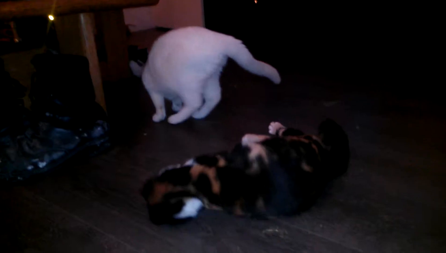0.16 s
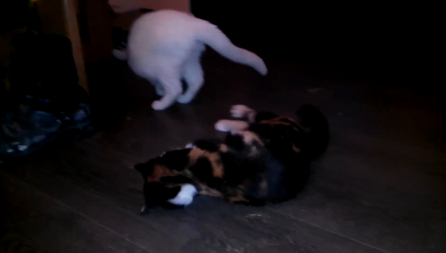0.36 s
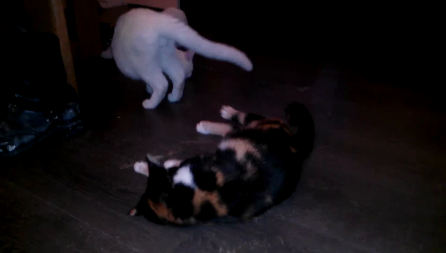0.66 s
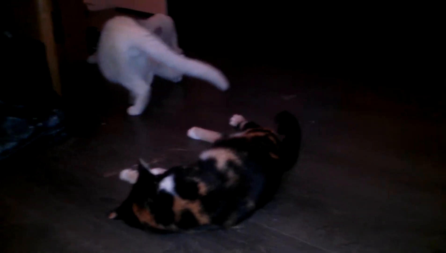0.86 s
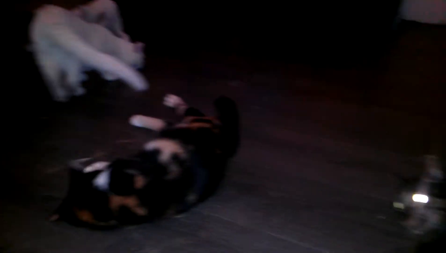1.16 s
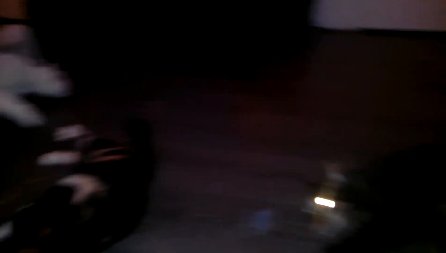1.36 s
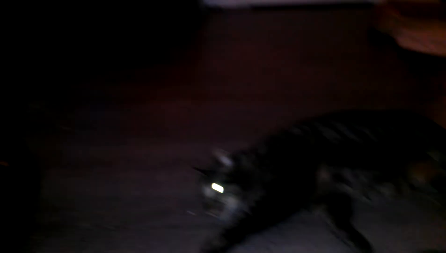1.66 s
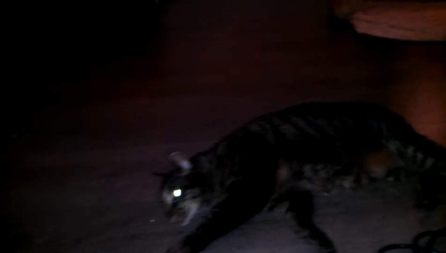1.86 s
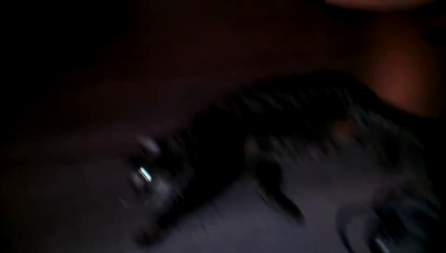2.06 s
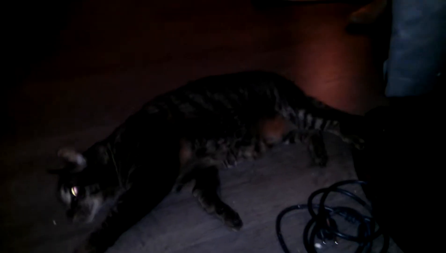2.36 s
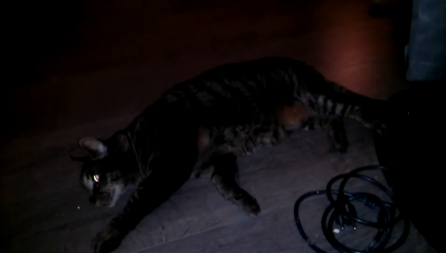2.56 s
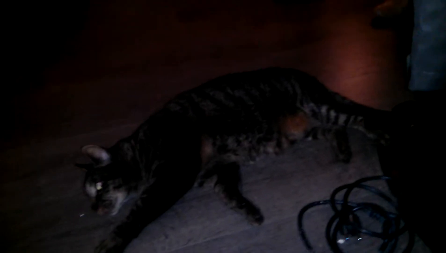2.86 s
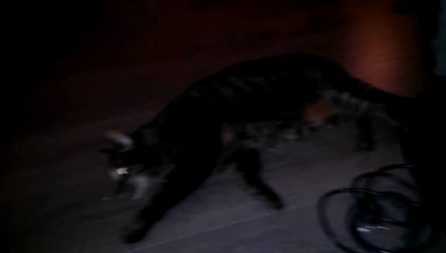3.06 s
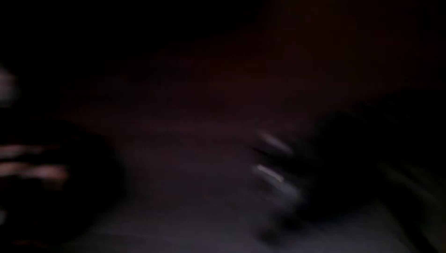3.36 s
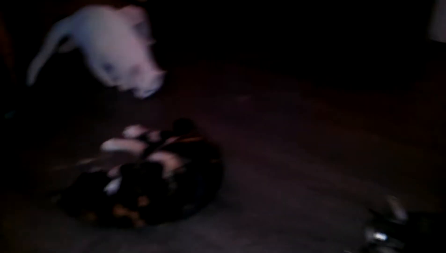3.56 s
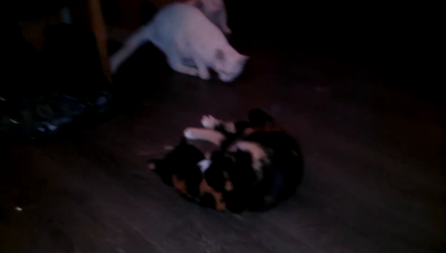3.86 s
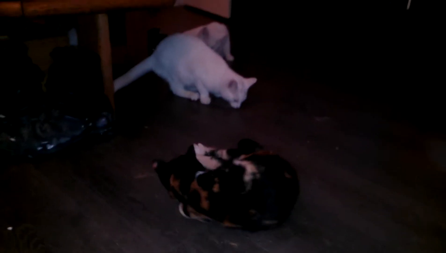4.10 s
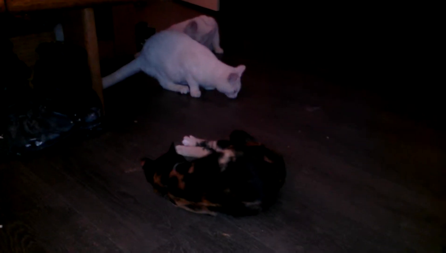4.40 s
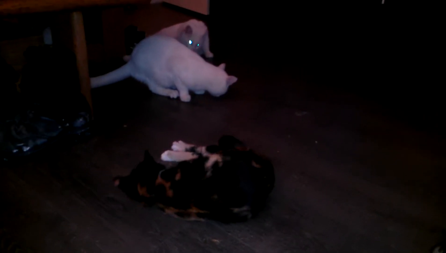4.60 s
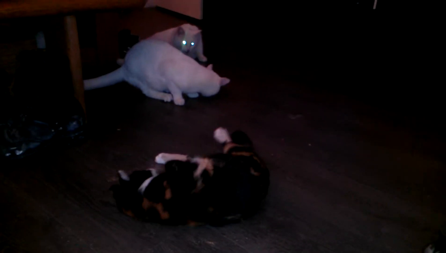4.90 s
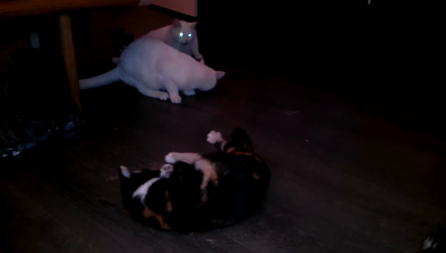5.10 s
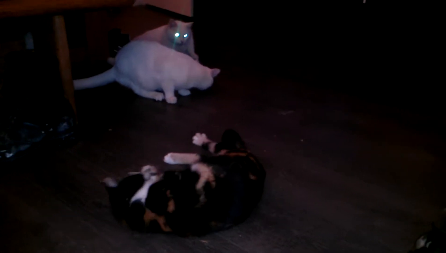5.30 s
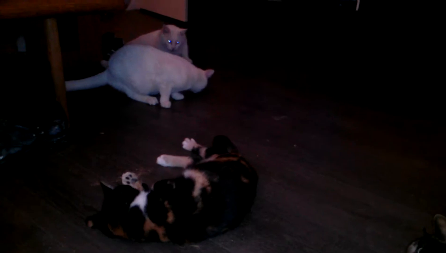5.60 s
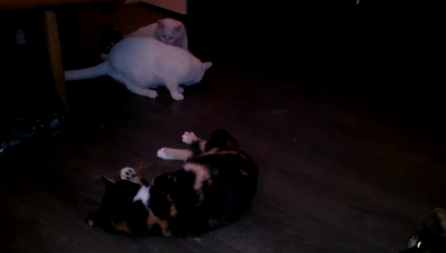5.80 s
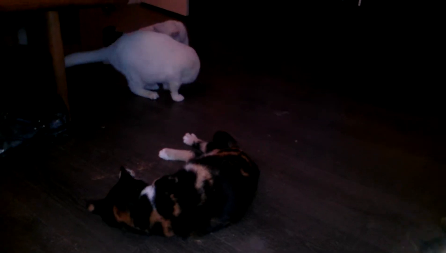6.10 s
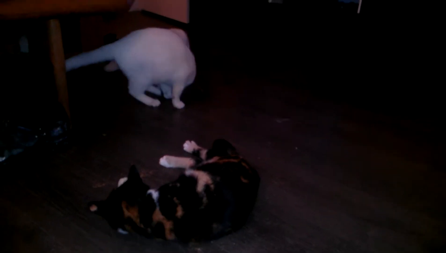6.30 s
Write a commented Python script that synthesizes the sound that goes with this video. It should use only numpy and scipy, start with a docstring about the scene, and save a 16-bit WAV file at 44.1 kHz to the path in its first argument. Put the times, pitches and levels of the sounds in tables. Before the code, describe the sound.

Cats roll softly on floorboards under clothing swishes and close microphone handling noise, including one loud scrape.

```python
"""Cats rolling on a wooden floor

In a quiet room fur brushes the boards, the wood knocks faintly and clothing slides and scuffs. A hand
and sleeve rub over a hand-held camera close by, which thumps, pops, judders and ticks.
Friction is grainy filtered noise; thumps and knocks are damped oscillations. Under it all lie room
noise and a faint mains hum, in mono."""
import sys
import numpy as np
from scipy import signal
from scipy.fft import rfft, irfft, next_fast_len
from scipy.io import wavfile
from scipy.ndimage import map_coordinates

SR = 44100
rng = np.random.default_rng(int(sys.argv[2]) if len(sys.argv) > 2 else 0)


def transcribe(signal):
    """Save signal, clipped to [-1, 1], as a 16-bit WAV file at the path in sys.argv[1]."""
    frames = np.atleast_2d(signal).T
    limited = np.clip(frames, -1, 1)
    pcm = np.round(limited * 32767).astype(np.int16)
    wavfile.write(sys.argv[1], SR, pcm)


N = 284445


def amp(db):
    """Amplitude ratio of a level in decibels."""
    return 10 ** (np.asarray(db) / 20)


def unit(x):
    """Normalisation to an rms of 1."""
    return x / np.sqrt(np.mean(x ** 2) + 1e-20)


def clock():
    """The time of every sample, in seconds."""
    return np.arange(N) / SR


def colour(spectrum, hz):
    """Spectral envelope: gain at hz, interpolated from (frequency_hz, gain_db) on a log axis."""
    frequency_hz, gain_db = np.transpose(spectrum)
    return amp(np.interp(np.log(hz + 1), np.log(frequency_hz), gain_db))


def filtered(x, response):
    """Linear filtering: the spectrum of x times a frequency response."""
    size = next_fast_len(N + 8192)
    hz = np.fft.rfftfreq(size, 1 / SR)
    return irfft(rfft(x, size) * response(hz), size)[:N]


def softened(x, cutoff_hz):
    """A second-order low-pass rolls off the treble."""
    return signal.lfilter(*signal.butter(2, min(cutoff_hz, SR / 3), fs=SR), x)


def wobble(rate_hz):
    """Random modulation: a smooth curve through rate_hz Gaussian values a second."""
    knots = rng.standard_normal(int(N * rate_hz / SR) + 4)
    return map_coordinates(knots, [clock() * rate_hz])


def swell(t, rise_s, fall_s, roundness=0.89):
    """Exponential growth and decay, joined by a rounded top at t = 0."""
    distance = np.where(t < 0, t / rise_s, t / fall_s)
    return np.exp(roundness - np.hypot(distance, roundness))


def held(contour, fade_s):
    """Amplitude envelope through (time_s, level_db), fading exponentially beyond both ends."""
    t = clock()
    time_s, level_db = np.transpose(contour)
    outside_s = np.abs(t - np.clip(t, time_s[0], time_s[-1]))
    return amp(np.interp(t, time_s, level_db)) * np.exp(-outside_s / fade_s)


def friction(grain_hz, grain_db):
    """Countless tiny slips add up to Gaussian noise, bunched into grains."""
    return rng.standard_normal(N) * amp(grain_db * wobble(grain_hz))


def fibres(spectrum):
    """Friction of hairs or threads: a grainy hiss with the given spectrum, at rms 1."""
    slips = friction(grain_hz=240, grain_db=1.68)
    return unit(filtered(slips, lambda hz: colour(spectrum, hz)))


def shell_friction():
    """Forced vibration: friction drives the resonant modes of the camera shell."""
    # spectrum of the rubbing: frequency_hz, gain_db
    spectrum = [(25, 1), (70, 9), (160, 5), (350, -2.5), (800, -5.5), (1200, -10), (2000, -9), (3000, -7.5),
                (5000, -5), (6500, -10), (8500, -21.5), (16000, -15.5)]
    # shell resonances: centre_hz, bandwidth_hz, gain_db
    modes = [(400, 140, -10), (497.5, 33, -6.5), (677, 65, -14.5), (1075, 51, -5), (1360, 680, 1),
             (1792, 40, -7)]

    def response(hz):
        ringing = sum(amp(gain_db) * 1j * hz * width / (centre ** 2 - hz ** 2 + 1j * hz * width)
                      for centre, width, gain_db in modes)
        return colour(spectrum, hz) * (1 + ringing)

    return filtered(friction(grain_hz=580, grain_db=-0.5), response)


def room():
    """The noise floor: low room noise, microphone hiss and a hum that wavers in level and phase."""
    # background spectrum: frequency_hz, gain_db
    spectrum = [(12, -38), (20, 7.5), (55, -3.5), (70, -8), (107, -2), (172, -10.5), (209, -11),
                (317, -14.5), (891, -23), (1020, -25), (1390, -25.5), (4760, -28), (6470, -45),
                (15800, -30)]
    # mains hum partials: pitch_hz, level_db
    partials = [(49.5, -57), (100, -60), (200, -67.5)]
    air = unit(filtered(rng.standard_normal(N), lambda hz: colour(spectrum, hz)))
    hum = np.zeros(N)
    for pitch_hz, level_db in partials:
        amplitude = np.sqrt(2) * amp(level_db + 0.77 * wobble(5.5))
        hum += amplitude * np.sin(2 * np.pi * pitch_hz * clock() + 1.9 * wobble(7.4))
    return amp(-52.5 + 0.65 * wobble(14)) * air + hum


def catches(rise_s=0.00059, cutoff_hz=7760):
    """Transient friction: the grip catches on the shell with a sudden scratch."""
    # snags of the grip: peak_s, level_db, decay_s
    snags = [(0.014, -32.5, 0.0072), (1.127, -32.5, 0.013), (1.157, -23.5, 0.0034), (4.521, -51, 0.023),
             (4.554, -41.5, 0.0082), (5.233, -41, 0.025), (5.342, -36, 0.039), (5.38, -31.5, 0.0029)]
    envelope = np.zeros(N)
    for peak_s, level_db, decay_s in snags:
        t = clock() - peak_s
        envelope += amp(level_db) * np.exp(np.minimum(t / rise_s, -t / decay_s))
    return envelope * unit(softened(shell_friction(), cutoff_hz))


def pops(flip_share=0.66, skin_cutoff_hz=1460):
    """A bipolar pulse, softened by skin: pressure builds, flips as the grip slips, and relaxes."""
    # slips of the grip: centre_s, relative_level_db, width_s
    slips = [(0.0165, -20.5, 0.0029), (1.0886, -17, 0.0011), (1.1285, -17, 0.00044), (1.1585, -8, 0.00079),
             (1.939, -10.5, 0.00055), (4.069, -27.5, 0.0017), (4.1958, -24.5, 0.00026),
             (6.25, -11.5, 0.00092)]
    pressure = np.zeros(N)
    for centre_s, level_db, width_s in slips:
        widths = (clock() - centre_s) / width_s
        pressure -= amp(level_db) * np.tanh(widths / flip_share) * np.exp(-np.abs(widths))
    return softened(pressure, skin_cutoff_hz)


def thumps(decay_cycles=0.9):
    """Heavily damped oscillation: a bump rocks the camera for a cycle or two."""
    # soft bumps: start_s, relative_level_db, pitch_hz
    bumps = [(0.017, -17.5, 53), (1.357, -13, 57.95), (1.401, -11, 165), (1.645, -35.5, 55),
             (3.206, -31, 42.6), (3.251, -32.5, 85), (3.62, -33.5, 50), (3.68, -33.5, 62),
             (4.555, -25.5, 79), (5.233, -22, 43.8), (5.34, -29, 34.8), (5.684, -15.5, 55),
             (5.698, -12, 130), (5.745, -17.5, 50.3), (6.248, -21.5, 66)]
    out = np.zeros(N)
    for start_s, level_db, pitch_hz in bumps:
        cycles = pitch_hz * np.maximum(clock() - start_s, 0)
        out += amp(level_db) * np.sin(2 * np.pi * cycles) * np.exp(-cycles / decay_cycles)
    return out


def fur(gain_db=3):
    """Sliding friction: fur brushes the boards unevenly, with a slightly whistly resonance."""
    # a cat's roll: time_s, relative_level_db
    roll = [(0.04, -51.5), (0.17, -53), (0.18, -55.5), (0.208, -47.5), (0.22, -53), (0.366, -68.5),
            (0.414, -56), (0.448, -62), (0.49, -52.5), (0.748, -67.5), (0.784, -59.5), (1.07, -61),
            (1.088, -56.5), (1.11, -55)]
    # spectrum of fur on wood: frequency_hz, gain_db
    spectrum = [(500, -16.5), (900, -10.5), (1500, -12), (2200, -8), (2850, 0), (3700, -11), (5000, -9),
                (6500, -11.5), (8800, -24), (16000, -29.5)]
    return held(roll, fade_s=0.036) * amp(gain_db + 0.99 * wobble(30)) * fibres(spectrum)


def slides(firm_db=-41, stir_db=-67.5, drag_db=-12.5, max_lead_s=0.065):
    """Cloth friction grows fuller with pressure; a stroke climbs from low drag through body to hiss."""
    # strokes of cloth: peak_s, level_db, rise_s, fall_s, body_re_hiss_db
    strokes = [(0.95, -55.5, 0.124, 0.086, -6), (1.453, -31, 0.016, 0.022, -17.5),
               (2.0, -45, 0.19, 0.14, -8.5), (2.056, -35, 0.004, 0.029, -15),
               (2.236, -38.5, 0.026, 0.024, -9), (2.583, -57, 0.0025, 0.018, -2.5),
               (3.232, -43, 0.02, 0.0198, -1), (3.49, -26.5, 0.041, 0.039, -9.5),
               (3.57, -33.5, 0.022, 0.027, -11), (3.712, -40, 0.0195, 0.016, -15.5),
               (3.919, -46, 0.082, 0.08, -10), (4.69, -66, 0.08, 0.073, -6), (5.02, -62, 0.1, 0.092, -4.5)]
    # spectra of light hiss, firm hiss, midrange body and low drag: frequency_hz, gain_db
    light_spectrum = [(900, -36), (2500, -6.5), (4000, -7.5), (5200, -4), (6300, 0), (7200, -2.5),
                      (8500, -11.5), (12000, -18), (16000, -18.5)]
    firm_spectrum = [(900, -43), (2500, -19.5), (4000, -7), (5800, 1), (7000, -4.5), (8500, -17.5),
                     (12000, -21), (16000, -24)]
    body_spectrum = [(300, -25.5), (750, -22), (1400, -1), (2900, -1), (4000, -4), (6000, -19),
                     (12000, -50)]
    drag_spectrum = [(300, -19), (600, -6), (950, 1), (1500, -2.5), (2500, -9.5), (6000, -39.5)]
    hiss_power, body_power, drag_power = np.zeros((3, N))
    for peak_s, level_db, rise_s, fall_s, body_db in strokes:
        t = clock() - peak_s
        body_lead_s = min(0.82 * rise_s, max_lead_s)
        drag_lead_s = min(2.2 * rise_s, max_lead_s)
        hiss_power += (amp(level_db) * swell(t, rise_s, fall_s)) ** 2
        body_power += (amp(level_db + body_db) * swell(t + body_lead_s, rise_s, fall_s)) ** 2
        drag_power += (amp(level_db + body_db + drag_db) * swell(t + drag_lead_s, rise_s, fall_s)) ** 2
    stir = amp(stir_db + 2.0 * wobble(5.8))  # the cats are never quite still
    hiss_rms = np.sqrt(hiss_power + stir ** 2)
    press = np.arctan(hiss_rms / amp(firm_db))  # 0 for the barest touch, a right angle for full pressure
    hiss = np.cos(press) * fibres(light_spectrum) + np.sin(press) * fibres(firm_spectrum)
    body = np.sqrt(body_power) * fibres(body_spectrum)
    drag = np.sqrt(drag_power) * fibres(drag_spectrum)
    return hiss_rms * hiss + body + drag


def rubs(rise_share=0.78):
    """Friction on the shell swells and lets go; a softer contact excites less treble."""
    # rubs over the camera body: peak_s, level_db, fall_s, cutoff_hz
    strokes = [(1.174, -26, 0.0095, 9800), (1.205, -33.5, 0.035, 8150), (1.236, -29, 0.0049, 7400),
               (3.846, -38.5, 0.0021, 6000), (3.95, -53.5, 0.11, 1810), (4.066, -49, 0.0095, 2530),
               (4.285, -45.5, 0.03, 7000), (5.359, -43, 0.023, 6500), (5.629, -39, 0.059, 5530),
               (5.688, -23, 0.0019, 3300), (5.706, -35, 0.013, 3150), (5.75, -31, 0.0091, 3600),
               (5.769, -38.5, 0.0093, 3440), (6.191, -50.5, 0.048, 2770), (6.032, -51.5, 0.26, 2050),
               (6.25, -27, 0.0061, 2600)]
    contact = shell_friction()
    out = np.zeros(N)
    for peak_s, level_db, fall_s, cutoff_hz in strokes:
        envelope = amp(level_db) * swell(clock() - peak_s, rise_share * fall_s, fall_s)
        out += envelope * unit(softened(contact, cutoff_hz))
    return out


def scrape(dull_hz=4600, bright_hz=6210, groan_db=-8, gain_db=-0.85):
    """Friction under load: a sleeve drags over the shell, brightening, and the camera body groans."""
    # the sleeve's drag: time_s, relative_level_db
    drag = [(1.26, -38.5), (1.34, -13), (1.402, -11.5), (1.48, -38.5)]
    # spectrum of the body under pressure: frequency_hz, gain_db
    groan_spectrum = [(50, -26), (150, -6.5), (320, -4.5), (480, -0.5), (1000, -13.5), (3000, -45)]
    contact = shell_friction()
    dull = unit(softened(contact, dull_hz))
    bright = unit(softened(contact, bright_hz))
    progress = np.interp(clock(), [drag[0][0], drag[-1][0]], [0, 1])
    rasp = (1 - progress) * dull + progress * bright
    groan = amp(groan_db) * fibres(groan_spectrum)
    envelope = amp(gain_db + 1.2 * wobble(120)) * held(drag, fade_s=0.011)
    return envelope * (rasp + groan)


def judder():
    """Stick-slip oscillation in the hardest rubs: a few cycles, too short to be heard as a pitch."""
    # bursts of slipping: centre_s, peak_db, slip_rate_hz, half_length_s
    bursts = [(1.397, -5.5, 675, 0.0067), (5.381, -31, 1550, 0.0026), (5.684, -23, 610, 0.0022),
              (5.749, -18, 1540, 0.0011), (6.252, -19.5, 640, 0.0019)]
    phase_drift = 0.62 * wobble(300)
    out = np.zeros(N)
    for centre_s, peak_db, slip_rate_hz, half_length_s in bursts:
        t = clock() - centre_s
        envelope = amp(peak_db) * np.exp(-(t / half_length_s) ** 2)
        out += envelope * np.sin(2 * np.pi * slip_rate_hz * t + phase_drift)
    return out


def ticks():
    """Broadband transients: short bright scuffs and ticks from cloth and camera handling."""
    # brief contacts: start_s, level_db, decay_s
    contacts = [(1.646, -32.5, 0.0053), (1.807, -34.5, 0.0037), (1.856, -41, 0.005), (2.048, -34.5, 0.018),
                (3.182, -42, 0.012), (3.219, -34.5, 0.008), (3.675, -38.5, 0.021), (4.553, -40.5, 0.0063),
                (4.846, -44, 0.0016), (5.031, -38.5, 0.00091), (5.253, -34.5, 0.00048),
                (5.726, -37, 0.00091), (6.284, -42.5, 0.00062), (6.294, -44, 0.00056)]
    # spectrum of a scuff or tick: frequency_hz, gain_db
    spectrum = [(300, -8.5), (1500, -8.5), (4000, -1.5), (6000, 3), (7200, -1.5), (8500, -13.5),
                (16000, -29)]
    t = clock()
    envelope = sum(amp(level_db) * (t >= start_s) * np.exp(-np.abs(t - start_s) / decay_s)
                   for start_s, level_db, decay_s in contacts)
    scuff = unit(filtered(rng.standard_normal(N), lambda hz: colour(spectrum, hz)))
    return envelope * scuff


def knocks(rise_s=0.0029, decay_s=0.0093):
    """Damped resonance: a padded bump on hollow wood starts softly and gives one short, blurred ring."""
    # bumps on the floor: start_s, relative_level_db, pitch_hz
    bumps = [(2.05, -48, 330), (2.585, -44.5, 677), (3.535, -44, 433), (3.627, -42.5, 524),
             (3.695, -46, 653), (4.52, -39, 372)]
    phase_blur = 0.78 * wobble(200)
    out = np.zeros(N)
    for start_s, level_db, pitch_hz in bumps:
        t = np.maximum(clock() - start_s, 0)
        envelope = amp(level_db) * (1 - np.exp(-t / rise_s)) * np.exp(-t / decay_s)
        out += envelope * np.sin(2 * np.pi * pitch_hz * t + phase_blur)
    return out


def scene():
    """Superposition: all sources add at one microphone, the same in both channels."""
    light_contacts = fur() + ticks() + knocks()
    handling = slides() + scrape() + rubs() + catches() + judder() + thumps() + pops()
    mono = light_contacts + handling + room()
    return np.array([mono, mono])


def record(dry, ceiling=0.97, top_hz=15850):
    """Soft saturation and band limiting: the camera rounds the peaks and cuts the highest treble."""
    rounded = dry / (1 + np.abs(dry / ceiling) ** 8) ** (1 / 8)
    return np.array([filtered(channel, lambda hz: hz < top_hz) for channel in rounded])


dry = scene()
out = record(dry)
transcribe(out)
```